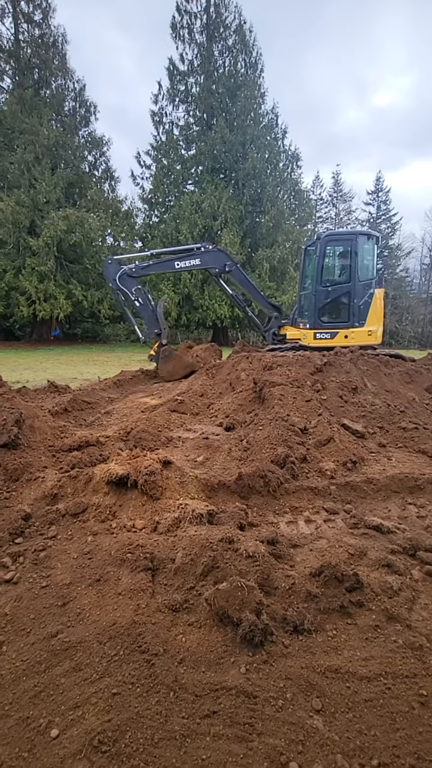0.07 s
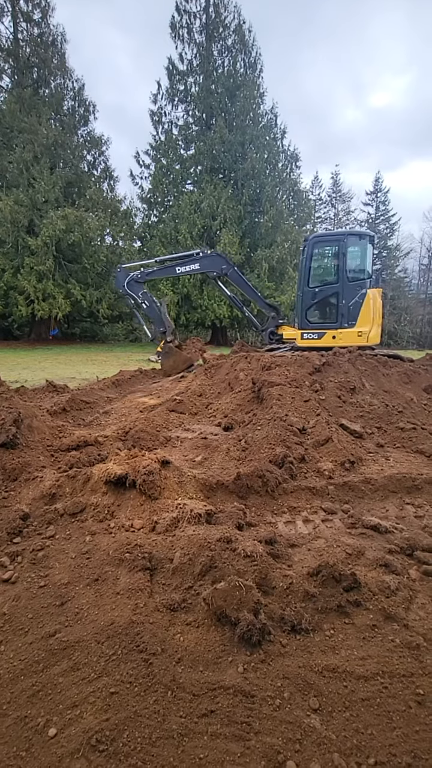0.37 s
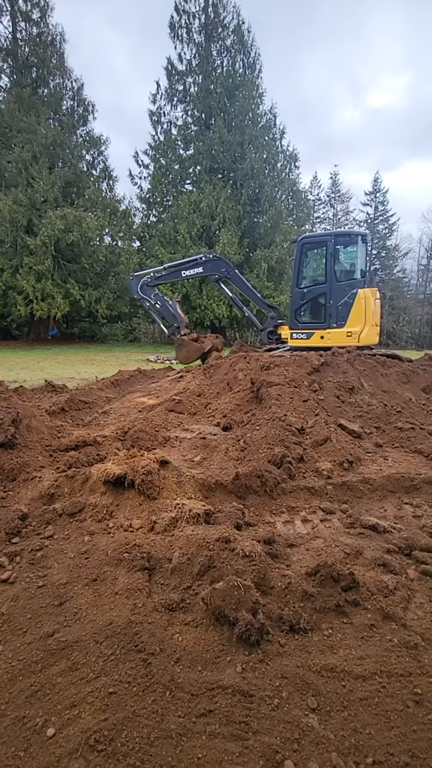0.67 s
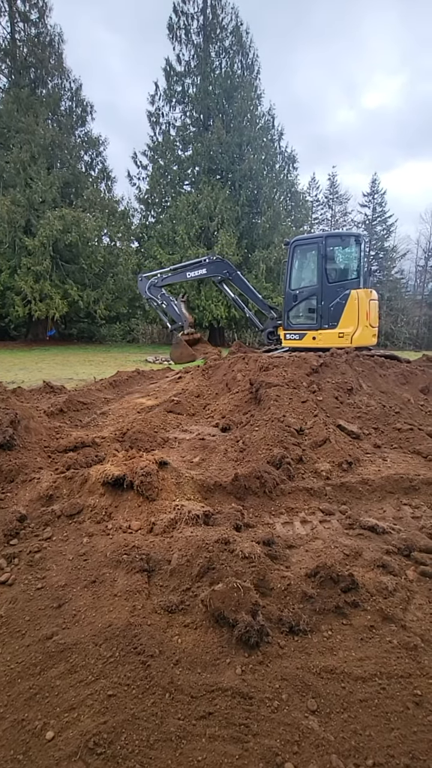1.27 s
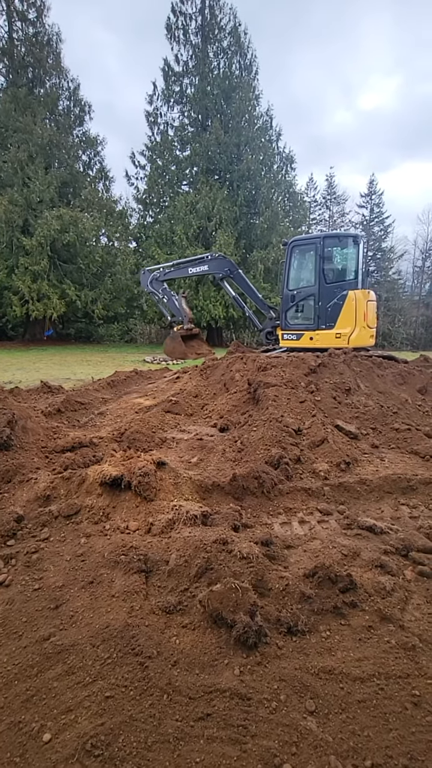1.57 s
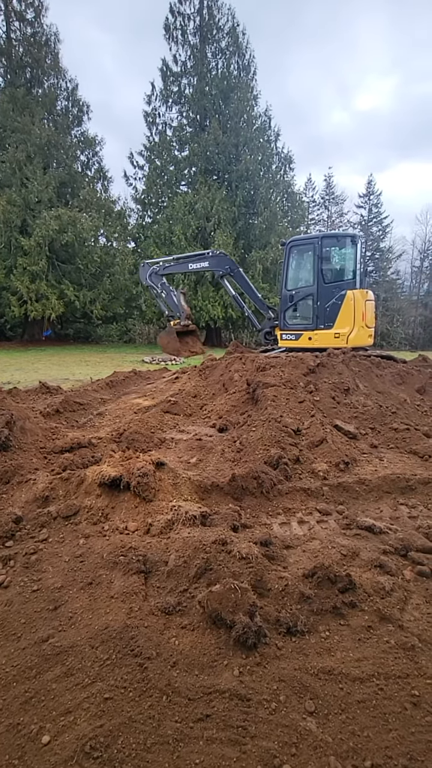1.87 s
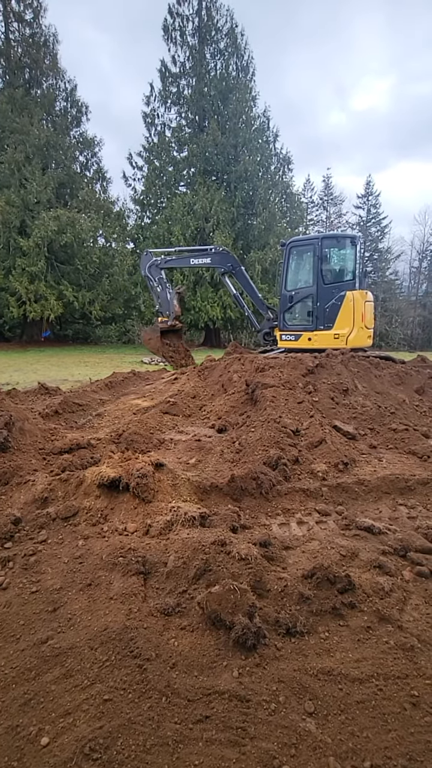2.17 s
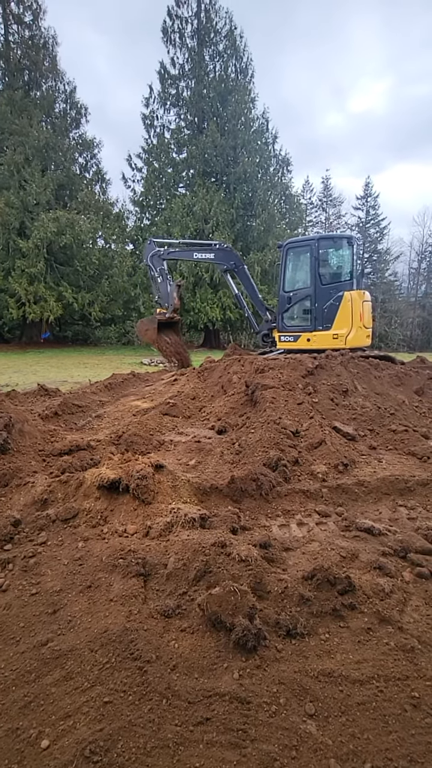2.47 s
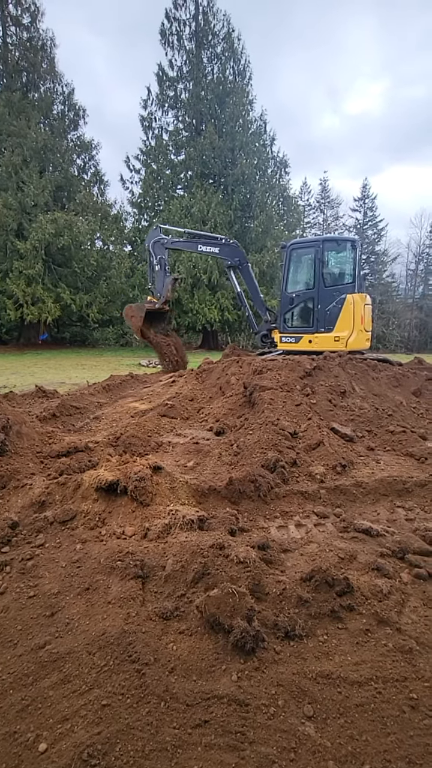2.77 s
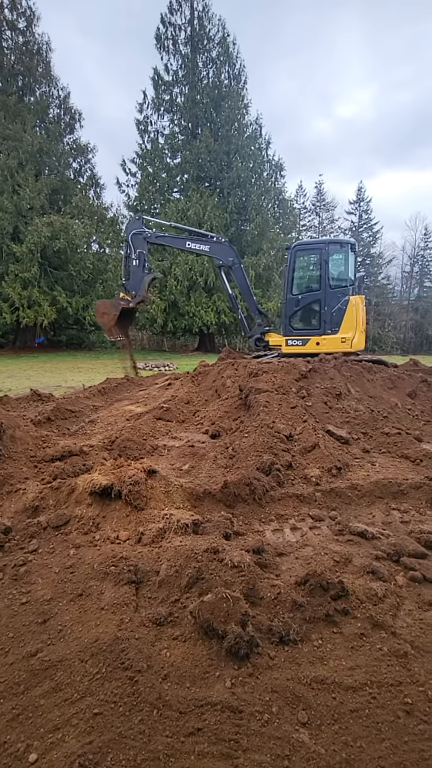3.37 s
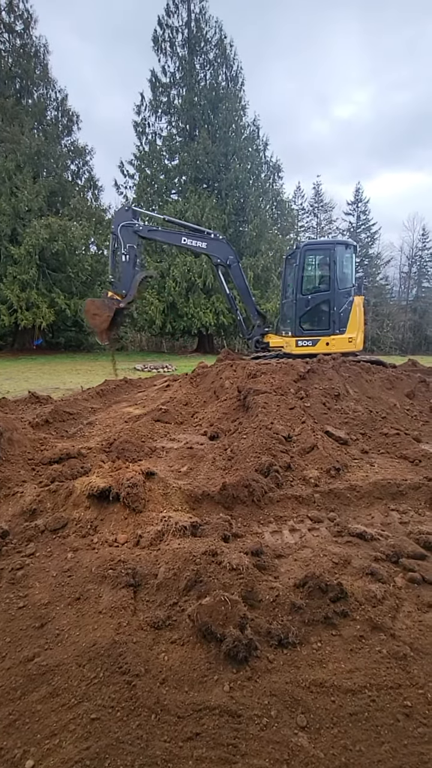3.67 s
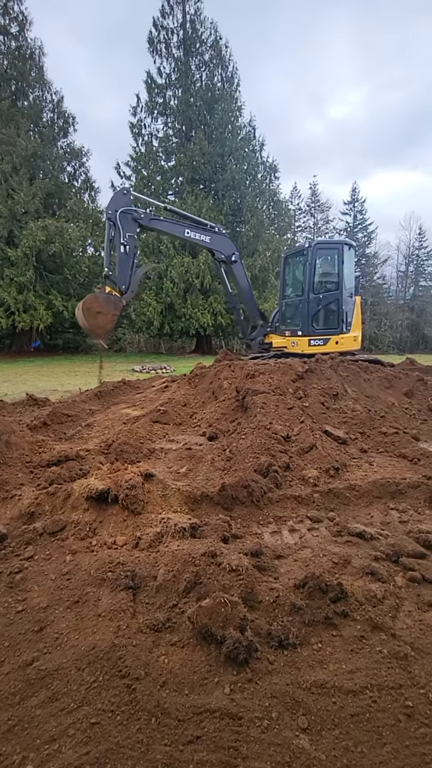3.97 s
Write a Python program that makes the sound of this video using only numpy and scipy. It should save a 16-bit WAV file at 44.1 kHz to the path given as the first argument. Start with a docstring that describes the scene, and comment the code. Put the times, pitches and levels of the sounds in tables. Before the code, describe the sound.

Small excavator digging outdoors, with a throbbing diesel engine, hydraulic whine and bucket clanks.

```python
"""A small diesel excavator works a heap of soil across an open yard. From the start its four-cylinder
engine drones and throbs under the whine of the hydraulics and a high hiss that comes and goes. The bucket
scoops: its shell booms, its pins clank and soil thuds down, heaviest at about 1.2 s. A dry pin squeaks
just after 2 s, then the lift brings a second flurry of booms and clanks, with stones clicking on steel.
In the last second the soil has settled, a thin whistle swells and a few more stones click."""
import sys
import numpy as np
from scipy import signal
from scipy.fft import rfft, irfft
from scipy.io import wavfile
from scipy.ndimage import uniform_filter1d

SR = 44100
rng = np.random.default_rng(int(sys.argv[2]) if len(sys.argv) > 2 else 0)


def transcribe(signal):
    """Save signal, clipped to [-1, 1], as a 16-bit WAV file at the path in sys.argv[1]."""
    frames = np.atleast_2d(signal).T
    limited = np.clip(frames, -1, 1)
    pcm = np.round(limited * 32767).astype(np.int16)
    wavfile.write(sys.argv[1], SR, pcm)


N = 176400
HIT_SAMPLES = 16384


# the deep exhaust drone (time [s], level [dB])
DRONE = [(0, -13.5), (.3, -14), (.6, -16.5), (1.2, -16), (1.6, -16.4), (2.3, -16), (2.85, -16),
         (3.1, -15.5), (3.5, -14.5), (3.85, -13.2)]
# its octave, strong under load (time [s], level [dB])
DRONE_OCTAVE = [(0, -39.5), (.7, -46), (1.3, -39.5), (2.0, -42.5), (2.35, -35), (3.0, -41), (3.4, -47),
                (4, -50)]
# hums either side of the drone, fading once the bucket is up (time [s], upper [dB], lower [dB])
THROB = [(0, -35, -48), (.6, -33.5, -46), (1.5, -33.5, -41), (2.0, -35.5, -36), (2.35, -43, -34.5),
         (2.85, -41, -34.5), (3.15, -44, -47), (4, -48, -52)]

def exhaust(firings):
    """The deep firing tone and its octave; two weaker hums beat against it and make it throb."""
    t, phase = np.arange(N) / SR, 2 * np.pi * firings
    tone = amp(curve(DRONE)) * (1 + .034 * drift(22)) * np.sin(phase)
    tone += amp(curve(DRONE_OCTAVE)) * np.sin(2 * phase)
    for hz, db in ((85.9, curve(THROB)), (67.2, curve(THROB, column=2))):
        tone += amp(db) * np.sin(2 * np.pi * hz * t + .4 * drift(1.2))
    return pan(-1.07) * np.sqrt(2) * tone


# tone colour of engine and fan (frequency [Hz], relative level [dB])
ROAR_SPECTRUM = [(20, -8), (40, 0), (62, 8), (100, 7), (150, -4.5), (210, -7), (350, -5), (450, -7.5),
                 (600, -10.5), (850, -9), (1150, -9), (1800, -15), (2350, -20), (2900, -20), (3800, -26.5),
                 (6000, -35), (8500, -42.5), (11000, -48), (15500, -45.5)]
# where each band of the roar sits (frequency [Hz], left over right [dB])
ROAR_PAN = [(60, -1), (200, 0.03), (380, -4), (700, -.5), (1290, -2), (2380, -2.5), (4400, -1.5),
            (6000, 0.9), (8120, 8), (15000, 9.8)]

def roar(firings):
    """Fan and combustion noise; its upper part rattles with each firing."""
    hz, _, bands = signal.stft(noise(ROAR_SPECTRUM), SR, nperseg=1024)
    # patches of the spectrum swell and sink at random
    patches = uniform_filter1d(rng.standard_normal(bands.shape[1:]), size=14, axis=0)
    patch_db = 1.5 * unit(uniform_filter1d(patches, size=5, axis=1))
    sides = amp(np.array([[.5], [-.5]]) * at_hz(ROAR_PAN, hz))[:, :, None]
    rush = signal.istft(bands * sides * amp(patch_db), SR, nperseg=1024)[1][:, :N]
    top = signal.sosfiltfilt(signal.butter(2, 600, "high", fs=SR, output="sos"), rush)
    knock = .061 * np.cos(2 * np.pi * firings) + .07 * drift(150)
    return amp(-30.5) * (rush + top * knock)


def harmonic(cycles, order):
    """One engine harmonic of rms 1, wavering in level and phase."""
    waver = amp(2 * drift(2.9))
    return unit(waver * np.sin(2 * np.pi * order * cycles + .41 * drift(6.6)))


# weaker engine tones (multiple of the four-stroke cycle rate, level before the swing [dB])
HARMONICS = [(3, -44.5), (5, -50.5), (6, -46), (16, -49), (20, -51.5), (28, -62), (36, -51.5), (44, -49.5),
             (51, -61.5), (63, -53.5), (95, -66)]
# level ride as the body swings (time [s], gain below 500 Hz [dB], gain above [dB])
SWING = [(0, 2, 0.5), (.6, 1.5, 0), (1.4, .5, -0.5), (1.9, -2.5, -0.5), (2.4, 0.5, 1), (3.0, -1, 0),
         (3.4, -0.5, 0.5), (4, -3.5, -0.6)]

def engine(firings, cycles):
    """Exhaust, roar and harmonics; the machine's body shields the last two as it swings."""
    running = roar(firings) + sum(amp(db) * harmonic(cycles, order) for order, db in HARMONICS)
    bass = signal.sosfiltfilt(signal.butter(2, 500, fs=SR, output="sos"), running)
    bass_gain, treble_gain = amp(curve(SWING)), amp(curve(SWING, column=2))
    return exhaust(firings) + bass_gain * bass + treble_gain * (running - bass)


# hollow booms of the bucket (time [s], level [dB], pitch [Hz])
BOOMS = [(.118, -26, 350), (.434, -23, 360), (.456, -24, 370), (.53, -28, 390), (.711, -19.5, 375),
         (.8, -28, 370), (.91, -28, 370), (1.012, -17, 400), (1.03, -20, 350), (1.072, -27, 370),
         (1.178, -22, 370), (1.214, -14.5, 390), (1.24, -16.5, 370), (1.29, -25, 390), (1.56, -25, 360),
         (1.58, -25, 380), (1.612, -26, 375), (2.016, -25, 470), (2.263, -20.5, 385), (2.308, -26, 350),
         (2.346, -23, 340), (2.38, -30, 390), (2.43, -22, 430), (2.513, -14.5, 385), (2.542, -18, 355),
         (2.572, -21, 350), (2.603, -25, 370)]
# the shell's modes for a boom pitched at 374 Hz (frequency [Hz], relative level [dB], T60 [s])
SHELL_MODES = [(270, -12, .06), (330, -5, .07), (374.3, -1, .06), (422.5, -7, .08), (474, -13, .07)]

def bucket_booms():
    """The steel shell booms, at a new pitch for each spot that is struck."""
    out = np.zeros((2, N))
    for s, db, hz in BOOMS:
        boom = ring(SHELL_MODES, stretch=hz / 374, rise=.0072, detune=.025)
        add(out, s, pan(-4.5) * amp(db) * boom)
    return out


# clanks of the bucket and its pins
# (time [s], rattle [dB], ring [dB], ring pitch [Hz], scraping contact [s], treble tilt [dB/octave])
CLANKS = [(.701, -25, -32, 2813, 0.0065, -2.5), (.716, -35, -40, 2400, .008, -4),
          (.779, -32, -38, 2600, 0.019, -1.5), (1.025, -28, -40, 2350, 0.013, -1.5),
          (1.045, -28, -38, 2550, 0.011, -2), (1.135, -33.5, -45, 2750, 0.0086, -1),
          (1.211, -28.5, -51, 2760, 0.01, -1.5), (1.227, -26.5, -29.5, 2700, 0.009, -.5),
          (1.553, -28, -58, 2600, 0.0049, -6), (1.901, -32.5, -55, 2600, .022, -8),
          (2.004, -33.5, -43, 2850, 0.02, -0.5), (2.262, -32, -54, 2600, 0.0081, -3),
          (2.277, -30.5, -29.5, 2604, .008, 0), (2.341, -34, -55, 2558, 0.016, -6),
          (2.429, -28.5, -24.5, 2630, 0.008, 0), (2.509, -25.5, -46, 2600, .013, -0.5),
          (2.526, -29, -26, 2640, 0.014, 1.5), (2.554, -31.5, -36, 3330, 0.012, 3.5),
          (2.569, -32, -36, 3330, 0.0097, -2), (3.258, -37, -38, 3300, 0.016, 1.5)]
# tone colour of the rattle before the tilt (frequency [Hz], relative level [dB])
RATTLE_SPECTRUM = [(200, -9), (450, 14.5), (700, -6), (1000, 6.5), (1350, -0.5), (1600, 0), (1900, 4.5),
                   (2300, -3.5), (3200, -3), (4200, -10), (6000, -18.5), (9000, -30.5), (15000, -55)]
# a pin's modes for a ring pitched at 2612 Hz (frequency [Hz], relative level [dB], T60 [s])
PIN_MODES = [(1870, -12, 0.096), (2590, 3, 0.061), (2720, -13, .035), (3220, -17, .07)]
PIN_PAN_DB, TILT_FROM_HZ = -3.5, 1150

def pin_clanks():
    """Steel scrapes on steel in a gritty rattle, and the pin rings."""
    out = np.zeros((2, N))
    for s, rattle_db, ring_db, ring_hz, contact_s, tilt_db in CLANKS:
        colour = [(hz, db + tilt_db * max(np.log2(hz / TILT_FROM_HZ), 0)) for hz, db in RATTLE_SPECTRUM]
        rattle = amp(rattle_db) * burst(colour, rise=.002, t60=.057, hold=contact_s)
        ringing = amp(ring_db) * ring(PIN_MODES, stretch=ring_hz / 2612, rise=.002, detune=.0022)
        add(out, s, pan(PIN_PAN_DB) * (rattle + ringing))
    return out


# stones on steel (time [s], level [dB], left over right [dB], ring pitch [Hz])
STONES = [(2.426, -39, 4, 5600), (2.518, -42, 11, 5230), (2.553, -32, 10, 7600), (2.556, -34.5, 12, 4540),
          (2.565, -36.5, 6, 7440), (3.435, -40, 10, 5200), (3.860, -26.5, -1, 5250), (3.871, -34, 0, 4900)]
# tone colour of a click (frequency [Hz], relative level [dB])
CLICK_SPECTRUM = [(1000, -2), (1600, 4), (3000, 6), (4200, -3), (5400, 0), (6800, -10), (9200, -15),
                  (15000, -23)]

def stone_clicks():
    """Each stone hits the bucket with a bright click and a tiny ring."""
    out = np.zeros((2, N))
    for s, db, pan_db, hz in STONES:
        click = burst(CLICK_SPECTRUM, rise=.0015, t60=.021)
        ringing = amp(-6) * ping(hz, rise=.0015, t60=.035)
        add(out, s, pan(pan_db) * amp(db) * (click + ringing))
    return out


# soil thudding down (time [s], level [dB], pitch [Hz])
THUDS = [(.1, -34, 100), (.27, -28, 105), (.418, -20.5, 112), (.57, -26, 120), (.81, -28, 110.4),
         (1.04, -27, 130), (1.194, -21.5, 126), (1.25, -17, 90.3), (1.255, -21.5, 165), (1.274, -23, 240),
         (1.418, -23.5, 115), (1.452, -26, 140), (1.534, -22, 140.8), (1.612, -28, 138), (2.161, -25, 135),
         (2.24, -28, 140), (2.295, -23, 151), (2.338, -23, 149.7), (2.41, -23, 140.2), (2.525, -31, 170),
         (2.6, -23.5, 114), (2.743, -26.5, 135.4), (2.853, -24, 115), (2.885, -25.5, 140)]
# dark colour of the crumbling (frequency [Hz], relative level [dB])
CRUMBLE_SPECTRUM = [(30, -18), (76, -1), (110, 3.5), (165, -0.5), (280, -3.5), (450, -10.5), (1500, -47)]

def soil_thuds():
    """Clods land with a short, dull push, then crumble."""
    out = np.zeros((2, N))
    for s, db, hz in THUDS:
        push = ping(hz, rise=.006, t60=.067)
        crumble = amp(-9) * noise(CRUMBLE_SPECTRUM, HIT_SAMPLES) * envelope(rise=.006, t60=.24)
        add(out, s, pan(8) * amp(db) * (push + crumble))
    return out


# whine of the hydraulic pump (time [s], level [dB])
PUMP_WHINE = [(0, -36.5), (.35, -38), (.52, -31.5), (.7, -35), (.92, -42), (1.35, -38), (2.1, -39.5),
              (2.6, -36.5), (2.75, -42.5), (3.0, -37.5), (3.41, -37), (3.46, -40.5), (3.6, -41.5), (4, -52)]

def pump_whine(cycles):
    """The pump beats eleven times to a turn of the shaft, so 22 times to an engine cycle."""
    level = amp(curve(PUMP_WHINE) + .69 * drift(9.9))
    return pan(-5) * level * np.sqrt(2) * np.sin(2 * np.pi * 22 * cycles)


# the strongest thin whistle (time [s], pitch [Hz], level [dB])
LEAD_WHISTLE = [(0, 2820, -60), (.3, 2820, -55), (.6, 2826, -48), (.95, 2790, -59), (1.4, 2812, -53),
                (1.65, 2799, -59), (2.1, 2820, -57), (2.7, 2820, -56.5), (3.05, 2840, -51.5),
                (3.3, 2830, -48), (3.46, 2850, -48), (3.72, 2820, -52), (4, 2840, -58)]
# fainter whistles, silent if the start lies after the end
# (start [s], end [s], pitch [Hz], width [Hz], level [dB], left over right [dB])
FAINT_WHISTLES = [(0, 4.5, 1750, 12, -58.5, 1), (10, 3.45, 2428, 11.5, -55, -3),
                  (2.75, 3.55, 2979, 17, -58, -4), (1.5, 3.55, 3262, 31, -59, -9),
                  (0, 3.3, 4340, 92, -64.5, -13.5), (1, 3.5, 6030, 230, -71, 17),
                  (0.8, 3.2, 7880, 280, -75, 19), (3.5, 4, 12620, 160, -62, 9)]

def hydraulic_whistles():
    """One thin whistle wavers in pitch while fuzzy ones fade in and out around it."""
    t, fade_s = np.arange(N) / SR, .068
    phase = 2 * np.pi * np.cumsum(curve(LEAD_WHISTLE)) / SR + 1.2 * drift(40)
    level = amp(curve(LEAD_WHISTLE, column=2) + 2 * drift(12))
    out = pan(-4) * level * np.sqrt(2) * np.sin(phase)
    for start, end, hz, width_hz, db, pan_db in FAINT_WHISTLES:
        gate = np.clip(np.minimum(t - start, end - t) / fade_s, 0, 1)
        out += pan(pan_db) * gate * amp(db + 1.5 * drift(4)) * fuzzy_tone(hz, width_hz)
    return out


# level ride of the hiss (time [s], relative level [dB])
HISS_RIDE = [(0, -55), (.28, -58), (.30, -48.5), (.5, -48.5), (.56, -56), (.65, -50.5), (.84, -52),
             (1.02, -60), (1.25, -61), (1.38, -70), (1.40, -53.5), (1.75, -49.5), (1.95, -53), (1.98, -74),
             (2.11, -75), (2.16, -62), (2.28, -50), (2.32, -72), (2.49, -58), (2.51, -49), (2.58, -50),
             (2.62, -72), (3.17, -57), (3.21, -47.5), (3.38, -47), (3.65, -51), (4, -49.5)]
# its airy colour (frequency [Hz], relative level [dB])
HISS_SPECTRUM = [(3000, -34), (7000, -15), (10600, -6.5), (11450, 0), (11950, -1.5), (12600, 4),
                 (13150, -4), (13800, -1), (14250, 2.5), (14700, -2.5), (15800, -9)]

def high_hiss():
    """A thin, high hiss cuts in and out on the left."""
    return pan(10) * amp(curve(HISS_RIDE) - 6) * noise(HISS_SPECTRUM)


def pin_squeak(at_s=2.065, swell_s=.025):
    """A dry pin gives one short, fuzzy squeal that swells and fades."""
    swell = np.exp(-((np.arange(N) / SR - at_s) / swell_s) ** 2)
    return pan(PIN_PAN_DB) * amp(-46) * swell * fuzzy_tone(3600, width_hz=250)


def tree_echo(sound):
    """A weak, diffuse echo from the edge of the wood."""
    tail = noise([(200, -2), (2000, 0), (10000, -13)], HIT_SAMPLES) * envelope(rise=.037, t60=.31)
    return amp(-16) * signal.fftconvolve(sound, tail / np.linalg.norm(tail[0]), axes=1)[:, :N]


# how alike left and right are in every noise layer (frequency [Hz], correlation [0-1])
STEREO_LIKENESS = [(60, 0.75), (150, 0.57), (350, 0.9), (700, 0.73), (1300, 0.75), (2800, 0.8),
                   (5000, 0.14), (12000, 0.18)]

def noise(spectrum, size=N):
    """Coloured stereo noise of rms 1, partly alike on the two sides."""
    hz = np.fft.rfftfreq(size, 1 / SR)
    mid, side = rfft(rng.standard_normal((2, size)))
    likeness = at_hz(STEREO_LIKENESS, hz)
    mid, side = mid * np.sqrt(1 + likeness), side * np.sqrt(1 - likeness)
    return unit(irfft(np.array([mid + side, mid - side]) * amp(at_hz(spectrum, hz)), size))


def envelope(rise, t60, hold=0):
    """A short rise, a hold, then a fall of 60 dB in t60; all in seconds."""
    t = np.arange(HIT_SAMPLES) / SR
    return np.minimum(t / rise, 1) * np.exp(-np.log(1000) * np.maximum(t - rise - hold, 0) / t60)


def burst(spectrum, rise, t60, hold=0):
    """A crowd of tiny impacts that dies away."""
    grit = amp(2.7 * drift(250)[:HIT_SAMPLES])
    return unit(noise(spectrum, HIT_SAMPLES) * grit) * envelope(rise, t60, hold)


def ping(hz, rise, t60):
    """One damped vibration."""
    return envelope(rise, t60) * np.sin(2 * np.pi * hz * np.arange(HIT_SAMPLES) / SR)


def ring(modes, stretch, rise, detune):
    """Struck steel: all modes shift in pitch by stretch, and each is detuned a little at random."""
    return sum(amp(db) * ping(hz * stretch * (1 + detune * rng.standard_normal()), rise, t60)
               for hz, db, t60 in modes)


def fuzzy_tone(hz, width_hz):
    """A narrow band of noise around one pitch, rms 1."""
    phase = 2 * np.pi * hz * np.arange(N) / SR
    return drift(width_hz / 2) * np.sin(phase) + drift(width_hz / 2) * np.cos(phase)


def drift(rate_hz):
    """A random wander of rms 1, mostly slower than rate_hz."""
    hz = np.fft.rfftfreq(N, 1 / SR)
    return unit(irfft(rfft(rng.standard_normal(N)) / (1 + (hz / rate_hz) ** 4), N))


def amp(db):
    """Decibels to gain."""
    return 10 ** (np.asarray(db) / 20)


def unit(x):
    """Scales to rms 1."""
    return x / np.sqrt(np.mean(x ** 2) + 1e-20)


def curve(rows, column=1):
    """One column of a time table at every sample."""
    rows = np.array(rows)
    return np.interp(np.arange(N) / SR, rows[:, 0], rows[:, column])


def at_hz(rows, hz):
    """Reads a frequency table on a log-frequency axis."""
    table_hz, value = np.transpose(rows)
    return np.interp(np.log(hz + 1), np.log(table_hz), value)


def pan(db):
    """Left and right gains for a level difference; positive is left."""
    return amp([[db / 2], [-db / 2]])


def add(mix, s, sound):
    """Mixes a sound in at s seconds."""
    part = mix[:, round(s * SR):][:, :sound.shape[-1]]
    part += sound[..., :part.shape[1]]


# governed engine speed (time [s], firing rate [Hz])
FIRING_RATE = [(0, 73), (.35, 72.7), (.6, 74), (.9, 73.7), (1.1, 72.6), (1.3, 73.7), (1.7, 73.2),
               (2.4, 72.5), (2.7, 73.5), (2.95, 72.7), (3.4, 73.4), (4, 74)]

def scene():
    """Engine and pump share one speed; only the steel echoes; the mix reaches the left ear first."""
    firings = np.cumsum(curve(FIRING_RATE)) / SR
    cycles = firings / 4  # four cylinders fire in each cycle
    steel = bucket_booms() + pin_clanks() + stone_clicks() + pin_squeak()
    diesel = engine(firings, cycles)
    hydraulics = pump_whine(cycles) + hydraulic_whistles()
    left, right = diesel + hydraulics + high_hiss() + steel + tree_echo(steel) + soil_thuds()
    lag = round(.0001 * SR)
    return np.array([left, np.pad(right, (lag, 0), "edge")[:N]])


def record(dry):
    """A steep low-pass trims the very top of the treble."""
    lowpass = signal.firwin(1023, 15780, window=("kaiser", 9), fs=SR)
    return signal.oaconvolve(dry, lowpass[None], "same")


dry = scene()
out = record(dry)
transcribe(out)
```